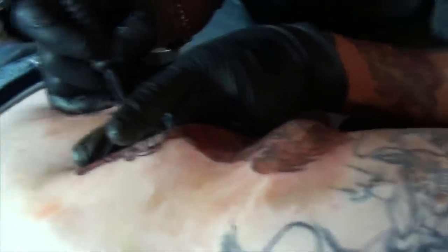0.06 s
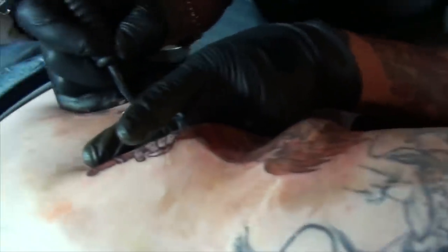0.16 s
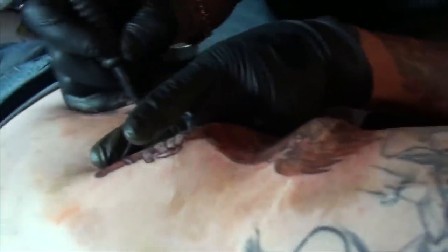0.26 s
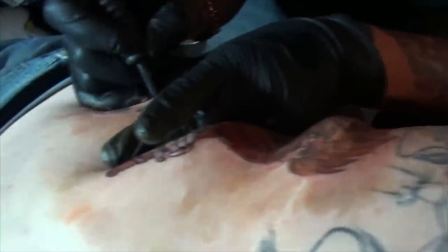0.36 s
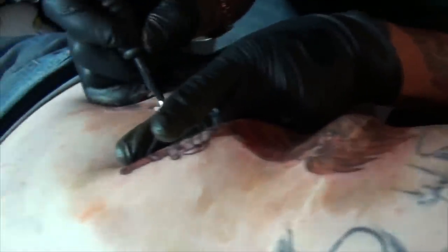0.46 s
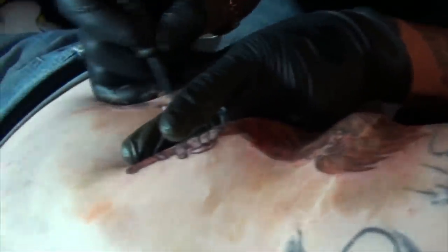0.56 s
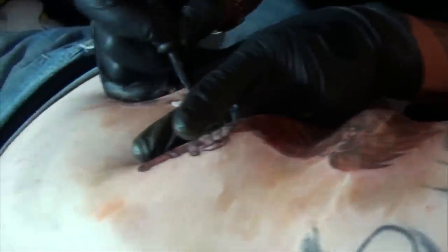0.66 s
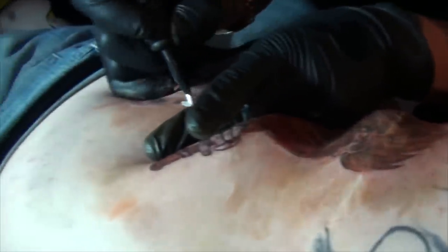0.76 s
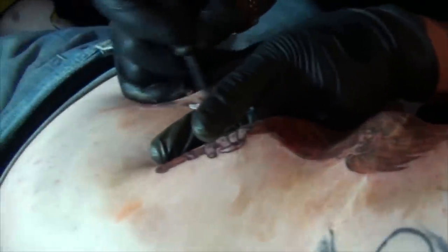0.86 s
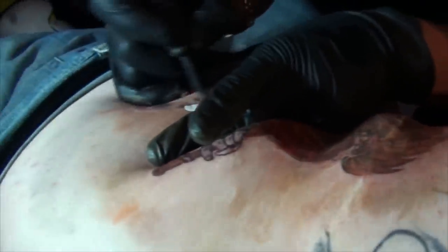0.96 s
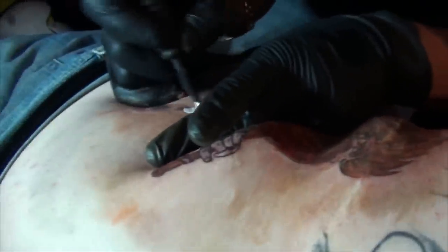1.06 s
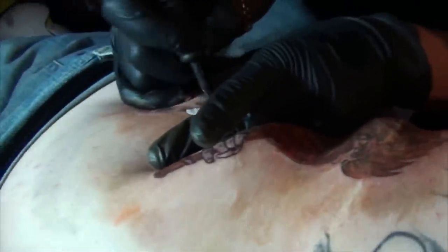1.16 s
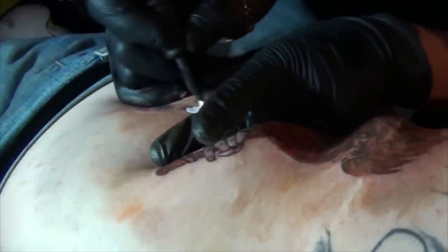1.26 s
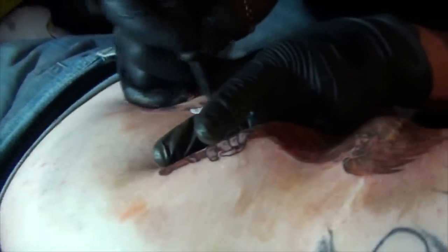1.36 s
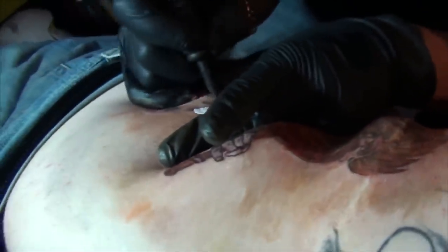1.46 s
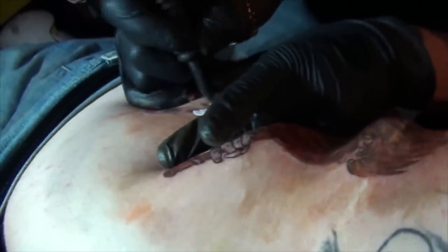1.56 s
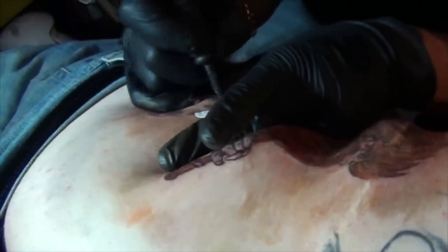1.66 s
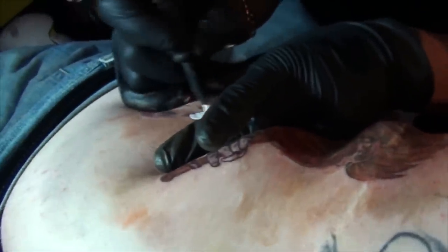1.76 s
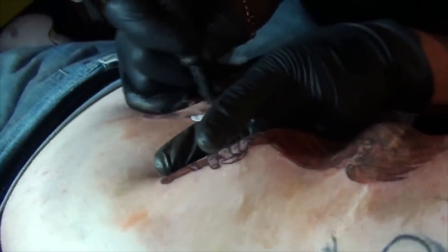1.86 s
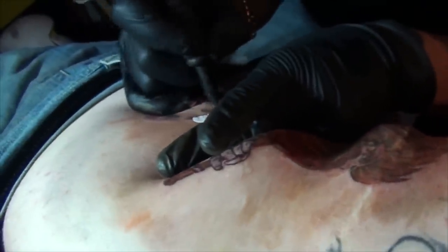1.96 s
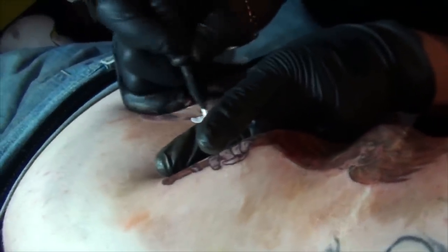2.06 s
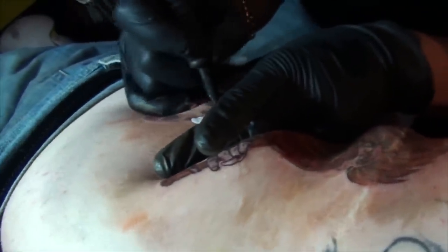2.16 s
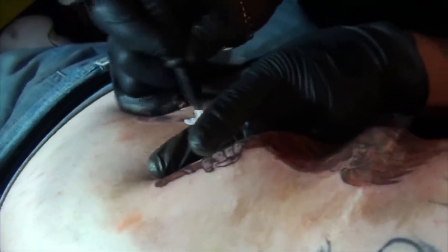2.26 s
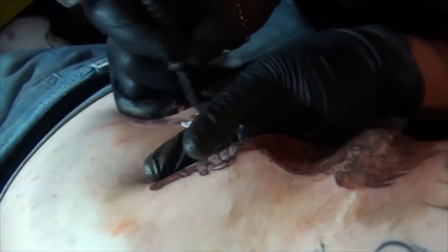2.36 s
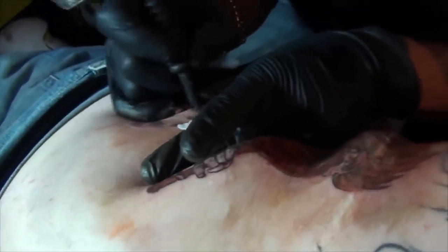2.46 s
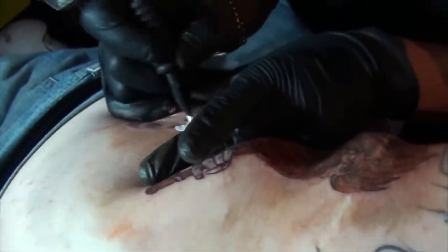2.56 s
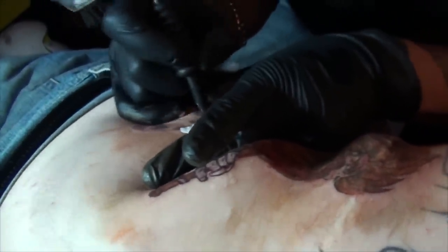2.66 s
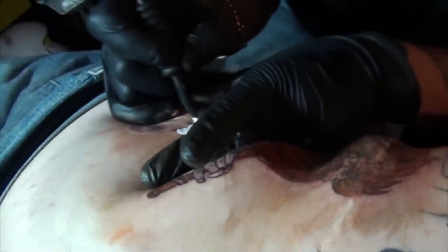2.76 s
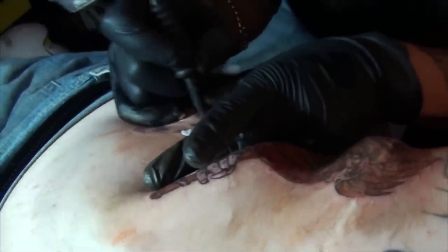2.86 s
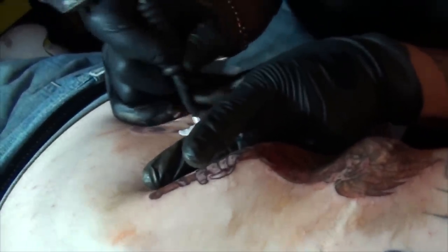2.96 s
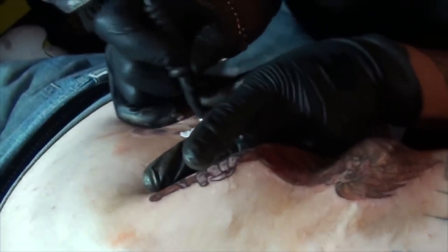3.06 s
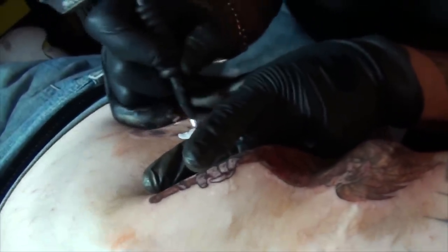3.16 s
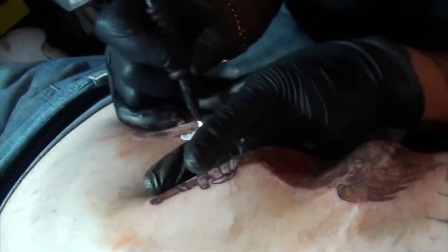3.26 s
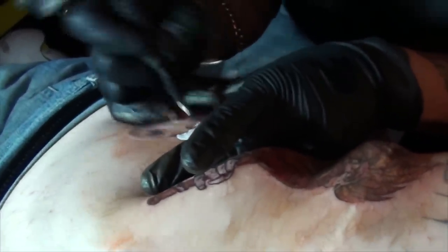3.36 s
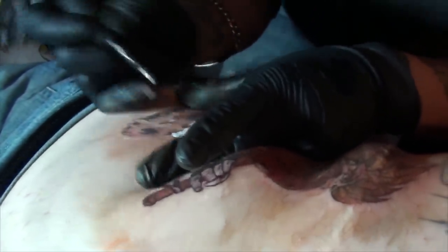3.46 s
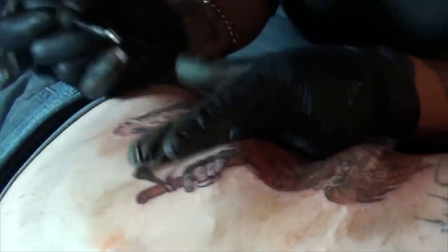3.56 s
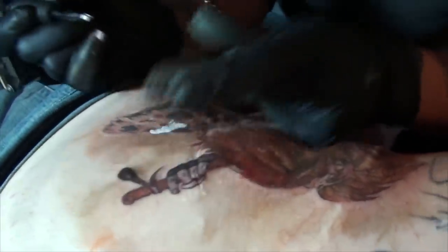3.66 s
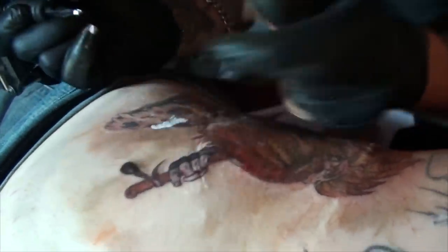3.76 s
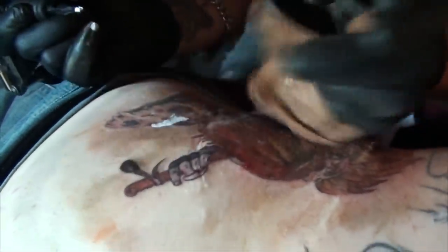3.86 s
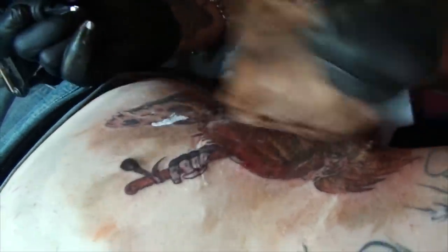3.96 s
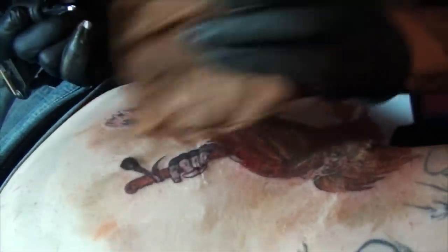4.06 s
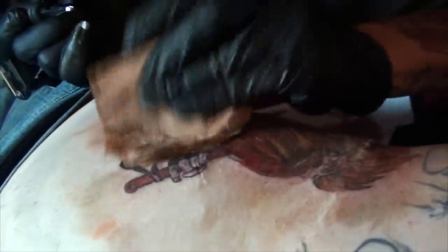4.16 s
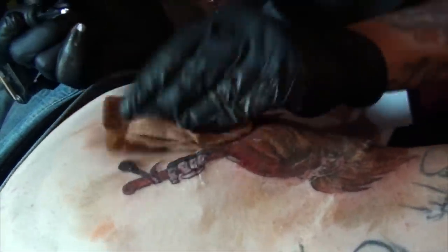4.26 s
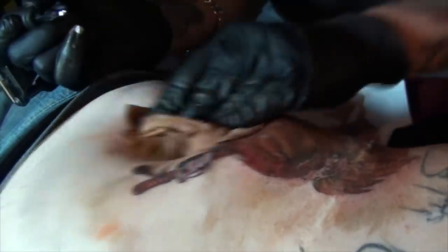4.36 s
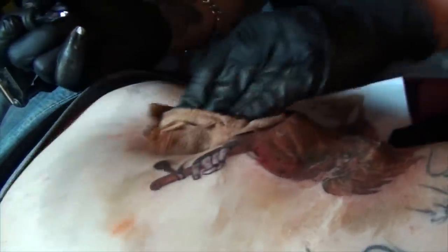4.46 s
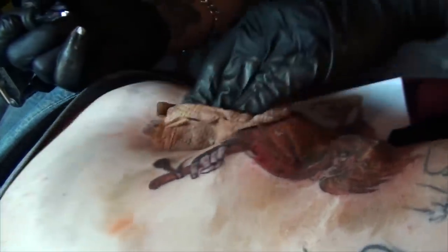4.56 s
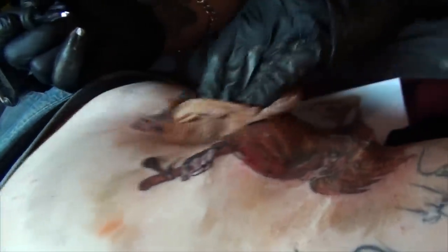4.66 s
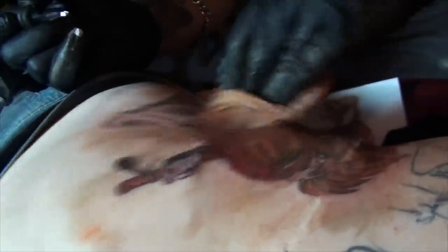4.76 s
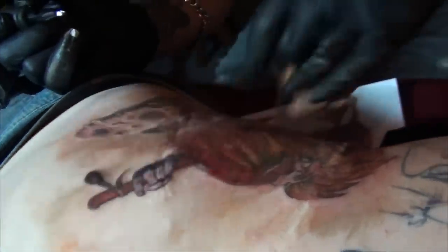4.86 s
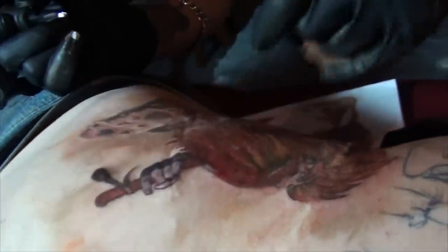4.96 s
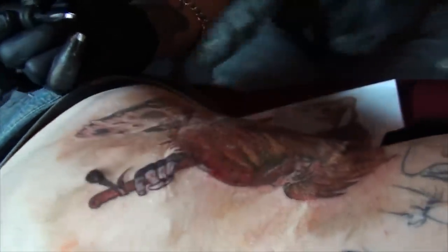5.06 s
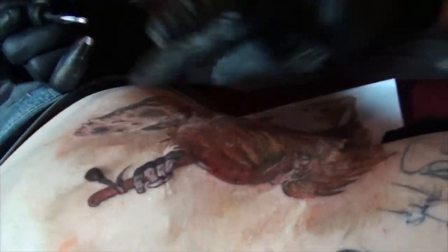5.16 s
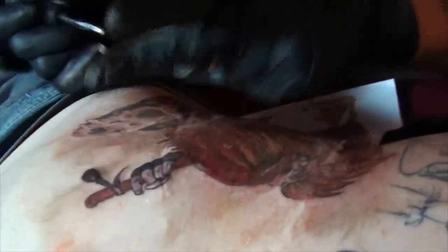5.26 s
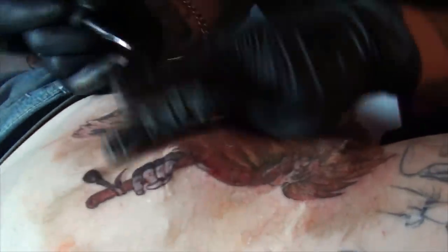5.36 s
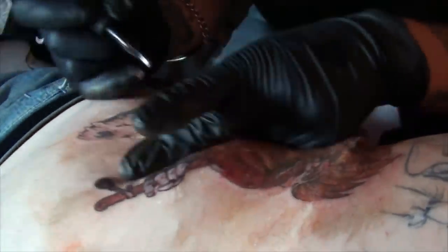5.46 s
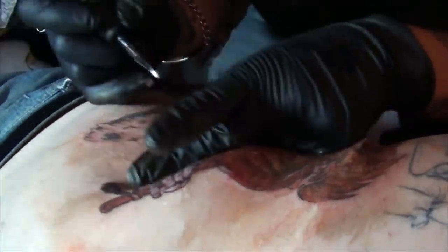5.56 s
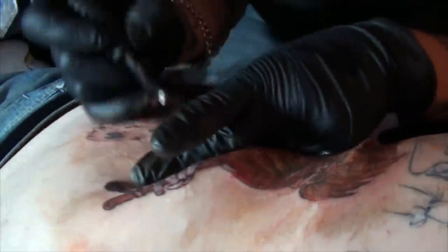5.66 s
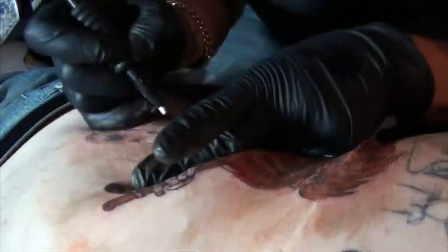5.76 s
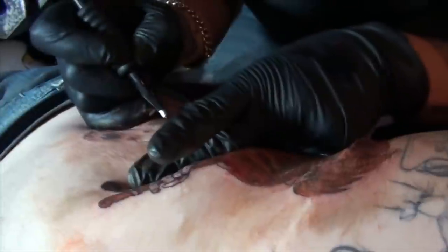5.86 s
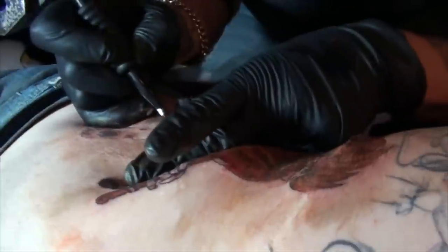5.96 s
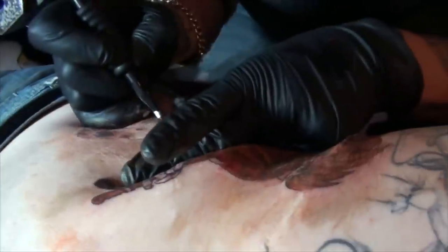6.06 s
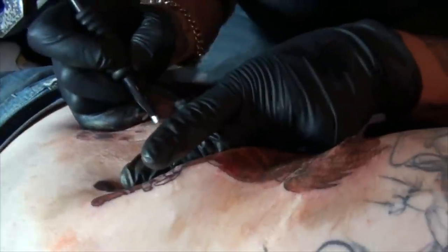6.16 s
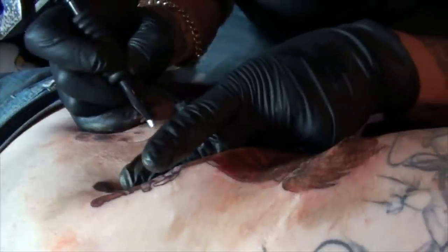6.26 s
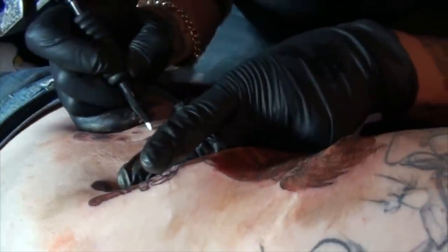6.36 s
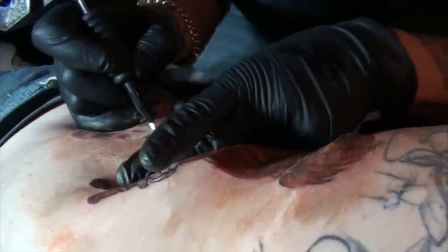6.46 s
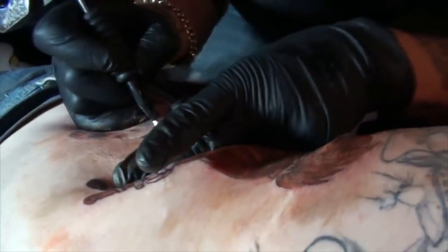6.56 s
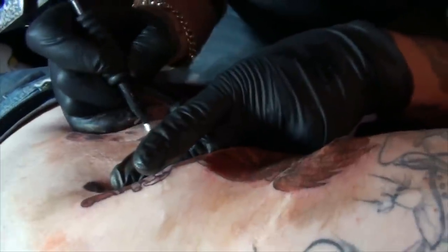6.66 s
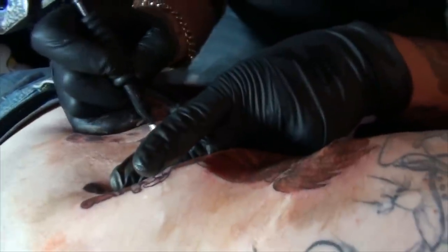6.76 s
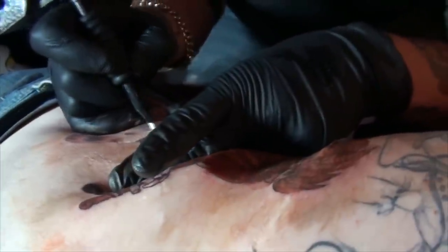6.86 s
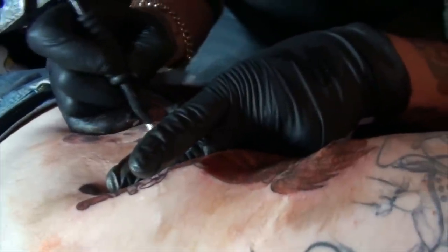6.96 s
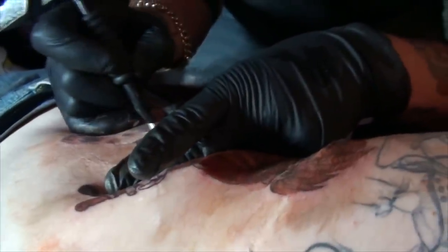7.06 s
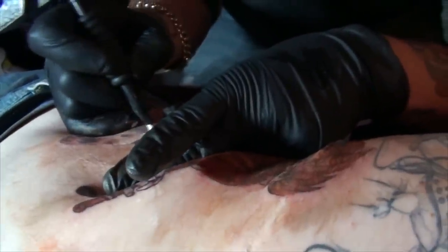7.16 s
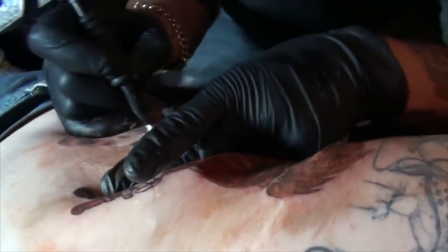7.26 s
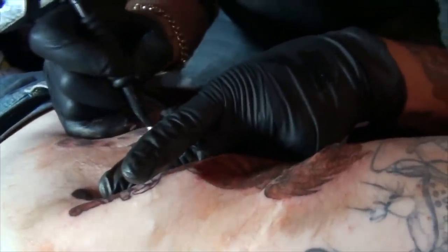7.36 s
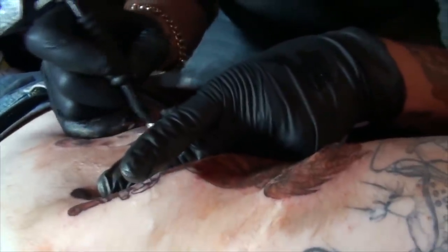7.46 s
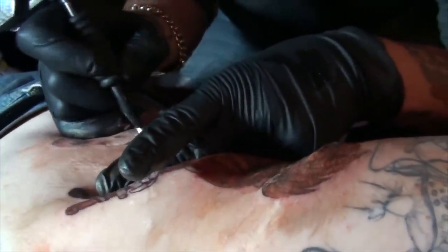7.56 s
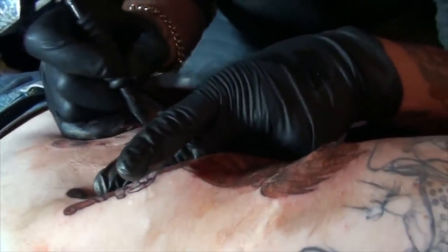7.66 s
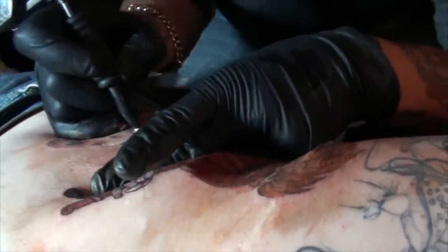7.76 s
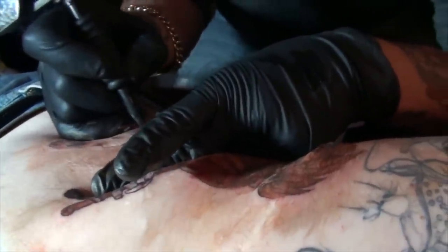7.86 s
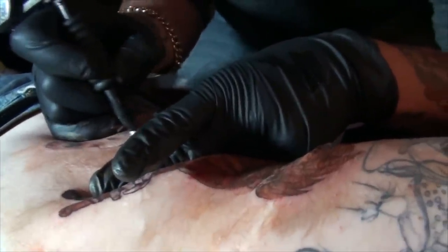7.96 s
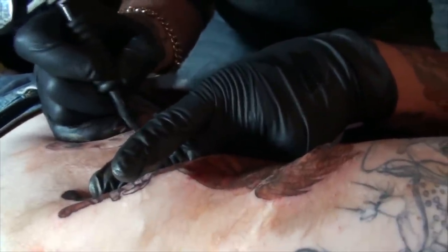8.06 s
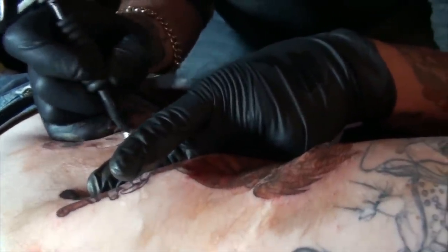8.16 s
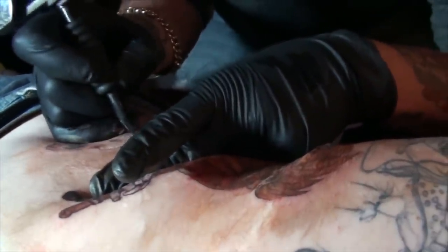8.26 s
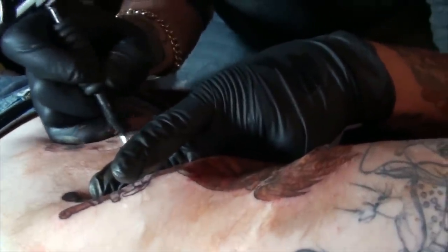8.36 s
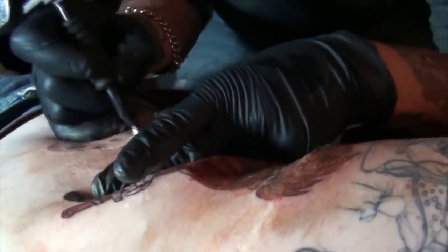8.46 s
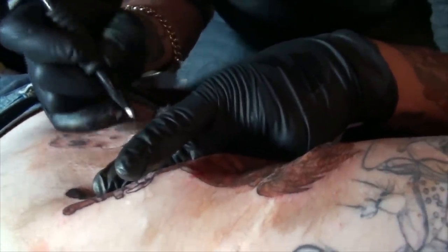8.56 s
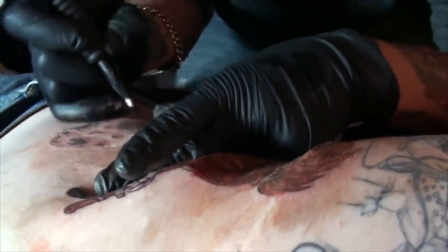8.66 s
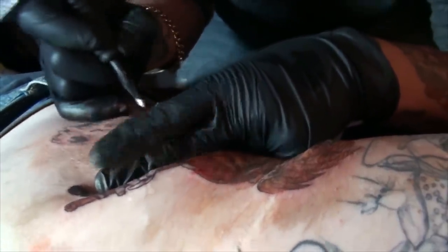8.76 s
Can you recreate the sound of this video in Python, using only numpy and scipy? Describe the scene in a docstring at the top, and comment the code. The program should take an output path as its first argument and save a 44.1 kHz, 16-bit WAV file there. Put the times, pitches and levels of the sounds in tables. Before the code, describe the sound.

In a small, slightly echoing studio, a close tattoo machine buzzes hard and metallic while a shriller second one whines at another bench. The near one cuts off, the far one shortly after; dry paper rubs over skin with light glove pats against a low room rush. Then the near buzz restarts, and later the far one joins. The microphone is close, with the sound leaning right.

```python
"""A near coil tattoo machine buzzes in a small studio: periodic armature impacts excite the modes of its frame.
A second, shriller machine buzzes at another bench, smeared by reflections and a short bench echo.
Both rest while a paper towel wipes the skin by stick-slip friction, amid soft glove pats; the near one restarts
and the far one joins it. Filtered noise and a faint wavering tone make the room's background.
A slowly recovering gain control lets that background rise during the pause."""
import sys
import numpy as np
from scipy import signal
from scipy.fft import rfft, irfft, next_fast_len
from scipy.io import wavfile
from scipy.ndimage import uniform_filter1d

SR = 44100
rng = np.random.default_rng(int(sys.argv[2]) if len(sys.argv) > 2 else 0)


def materialize(psi):
    """Save the field psi as 16-bit PCM at rate SR to the path in sys.argv[1].

    A 1-D psi becomes a single channel; in a 2-D psi each row is a channel.
    """
    bounded = np.clip(np.atleast_2d(psi).T, -1, 1)
    quanta = np.round(bounded * 32767).astype(np.int16)
    wavfile.write(sys.argv[1], SR, quanta)


N = 389403
TIME = np.arange(N) / SR
PADDED = next_fast_len(N + 4096, real=True)
HZ = np.fft.rfftfreq(PADDED, 1 / SR)

# near foot switch held down: (on t/s, off t/s)
NEAR_RUNS = [(0, 3.515), (5.874, 8.84)]
# impacts in one armature cycle: (delay/s, relative level/dB, timing scatter/us,
# delay added under full load/s, level added under full load/dB)
NEAR_IMPACTS = [(0, 13, 3, 0, 1.5), (.00093, -4, 7, 0.00055, -3), (.00284, 3.5, 8, 0.0012, 4.5)]
# ring of the frame shaded by the hand, in the open, and under load: (f/Hz, relative level/dB per Hz)
SHADED_RING = [(1000, -51.5), (1700, -32), (2170, -14.5), (2610, -19.5), (2870, -19), (3060, -9),
               (3330, -16), (4200, -13.5), (5260, -14), (6220, -10.5), (6760, -6.5), (7560, -2),
               (9550, -9.5), (11500, -0.5), (14000, -15.5), (15800, -20)]
OPEN_RING = [(880, -52), (1500, -28), (1720, -17.5), (1830, -27), (1980, -16), (2450, -14), (2800, -18),
             (3020, -8), (3650, -11), (3930, -2), (4150, .5), (4450, -2), (5100, -6.5), (5560, -11.5),
             (6000, -7), (6900, -3), (7700, 1), (8150, -7.5), (9200, -1.5), (9700, -2.5), (10700, -1.5),
             (11700, 2), (13000, -2), (14000, -14), (15800, -16)]
LOADED_RING = [(880, -60.5), (1500, -34), (1700, -18), (1830, -25), (2080, -9), (2380, -8), (2870, -15),
               (3050, -2.5), (3360, -8.5), (3680, -7.5), (4050, -2.5), (4520, -1.5), (5350, 0),
               (5780, -4.5), (6510, -1), (7040, -1), (7450, 2), (8170, -4), (9100, 0), (10500, -4),
               (11800, -3), (13000, 0.5), (13800, -7), (14800, -6.5), (15800, -7.5)]
# clean hum of the frame: (multiple of the strike rate, relative level/dB)
NEAR_HUM = [(5, -23), (6, -14.5), (7, -24.5), (8, -22), (9, -15.5), (10, -21), (11, -27), (12, -16.5),
            (13, -16), (15, -14), (16, -22), (17, -11)]
# level difference, left minus right: (f/Hz, level/dB)
NEAR_SIDE = [(800, -13.5), (2400, -2.5), (4400, -2.5), (8000, -5), (11000, -1.5), (14000, -11.5)]
# reverberation time of the studio by band, for both machines and the towel: (f/Hz, T60/s)
STUDIO_DECAY = [(1000, 0.42), (5000, 0.26), (10000, 0.19), (16000, 0.048)]
STROKE_RISE_HZ = 1.7  # added strike rate per unit of push: load shortens the swing, so strikes quicken


def near_machine(hum_db=-58, hum_waver_db=2.2, close_db=-5.5, hand_sway_per_s=1.7, close_t60=0.008,
                 close_low_db=-6, room_db=-9, sway_per_s=0.6):
    """Impact excitation of modes: strikes ring the steel frame; hand and skin change modes and rebounds."""
    rate_hz, level_db, turned, pressed, depth = grip()
    push = depth * strokes()
    turns = np.cumsum(rate_hz + STROKE_RISE_HZ * push) / SR
    load = pressed + push
    drive = strikes(turns, NEAR_RUNS, NEAR_IMPACTS, uneven_db=1.0, rattle=0.55, rattle_s=0.0023, load=load)

    turned, pressed = np.clip(turned, 0, 1), np.clip(load, 0, 1)
    free = (1 - turned) * ring(drive, SHADED_RING) + turned * ring(drive, OPEN_RING)
    loaded = ring(drive, LOADED_RING)
    buzz = gain_of(level_db) * ((1 - pressed) * free + pressed * loaded)

    hum = np.zeros(N)
    for multiple, db in NEAR_HUM:
        amplitude = gain_of(hum_db + db + hum_waver_db * drift(per_s=9))
        hum += amplitude * np.sin(2 * np.pi * (multiple * turns + rng.random()))
    hum = hum * uniform_filter1d(held(NEAR_RUNS), size=200)  # soft edges

    scattered = shaped(buzz, [(3000, close_low_db), (8000, 0.028)])  # fingers scatter mostly short waves
    close = shifting_echoes(scattered, [(1000, close_t60), (16000, close_t60)], .0001, hand_sway_per_s)
    room = shifting_echoes(buzz, STUDIO_DECAY, 0.0038, sway_per_s)
    return placed(buzz + hum + gain_of(close_db) * close + gain_of(room_db) * room, NEAR_SIDE)


# grips on the near machine: (from t/s, strike rate before strokes f/Hz, level/dB,
# turn from shaded to open 0-1, needle pressed into the skin 0-1, swing of that pressure in a stroke 0-1)
GRIPS = [(0, 131, -37, 0.4, 0.2, 0.15), (.45, 131.1, -37.7, 0.16, 0.18, 0.23),
         (2.1, 131.1, -39, 0.07, 0.15, 0.22), (3.43, 131.2, -34, 1, 0.05, 0.06),
         (5.7, 131.5, -37, 0.88, 0.12, 0.07), (6.499, 131.4, -39.3, 0.76, 0.79, 0.29),
         (7.64, 131.5, -37, 0.66, 0.39, 0.23)]
SHIFT_S = 0.048  # time the hand takes to change grip


def grip():
    """Piecewise-steady control: rate, level, turn, pressure and stroke depth glide from grip to grip."""
    rows = np.array(GRIPS)
    moved = np.clip((TIME - rows[1:, :1]) / SHIFT_S + .5, 0, 1)
    return rows[0, 1:, None] + np.diff(rows[:, 1:], axis=0).T @ moved


STROKES_PER_S, STROKE_UNEVEN = 4.04, 0.0757  # small shading circles; unevenness in turns


def strokes():
    """Phase-jittered circular motion: +1 is deepest in the skin, -1 lightest."""
    return np.cos(2 * np.pi * (STROKES_PER_S * TIME + STROKE_UNEVEN * drift(STROKES_PER_S)))


def strikes(turns, runs, impacts, uneven_db, rattle, rattle_s, load=0, first_swing=0.52, build_s=0.0017,
            size=12):
    """Periodic impact: the armature hits, rebounds and hits its contact; each hit trails a short rattle."""
    at, since = strike_times(turns, runs)
    swing = 1 - (1 - first_swing) * np.exp(-since / build_s)
    load = np.interp(at, TIME, load * np.ones(N))
    clicks, energy = np.zeros(N), 0
    for delay, db, scatter_us, load_s, load_db in impacts:
        slip, force = rng.standard_normal((2, len(at)))
        place = (at + delay + load_s * load + scatter_us * slip / 10 ** 6) * SR
        # a windowed sinc places each click between samples
        index = place.astype(int)[:, None] + np.arange(-size, size + 1)
        offset = index - place[:, None]
        strength = swing * gain_of(db + load_db * load + uneven_db * force)
        pulse = np.sinc(offset) * np.sinc(offset / (size + 1)) * strength[:, None]
        clicks += np.bincount(np.clip(index, 0, N - 1).ravel(), pulse.ravel(), N)
        energy += gain_of(db) ** 2
    keep = np.exp(-1 / (rattle_s * SR))
    trail = np.sqrt(signal.lfilter([1 - keep], [1, -keep], clicks ** 2) + 1e-20)
    fizz = signal.lfilter([1, -.6], [1], rng.standard_normal(N))  # the rattle is brighter than the strike
    scale = np.sqrt(N / turns[-1] / energy / (1 + rattle ** 2))
    return (clicks + rattle * trail * fizz) * scale


def strike_times(turns, runs):
    """Phase accumulation: one strike a cycle from switch-on; gives t/s and time since switch-on/s."""
    rows = []
    for on, off in runs:
        first, last = np.interp([on, off], TIME, turns)
        at = np.interp(np.arange(first, last), turns, TIME)
        rows.append([at, at - on])
    return np.hstack(rows)


def held(runs):
    """On-off gating: 1 while the foot switch is down, 0 otherwise."""
    return sum((TIME >= on) & (TIME < off) for on, off in runs) * 1.


# round trips of a wave through the steel frame, tube and needle bar: (t/s)
ROUND_TRIPS = [.00018, .00031]


def ring(x, points, spread_s=0.001004, bounce=0.64, size=4096):
    """Dispersion and modal ringing: a causal response of unit energy draws each click out into a burst."""
    hz = np.fft.fftfreq(size, 1 / SR)
    log_gain = np.log(gain_of(read(points, abs(hz))))
    # bending waves carry the treble ahead; spread_s is their delay at 2 kHz
    lag = 4 * np.pi * spread_s * np.sign(hz) * np.sqrt(2000 * abs(hz))
    spectrum = np.exp(np.conj(signal.hilbert(log_gain)) - 1j * lag)  # minimum phase, then the lag
    bounce = np.clip(bounce, 0, .85)
    for trip in ROUND_TRIPS:  # lossless (all-pass) bouncing between the ends
        echo = np.exp(-2j * np.pi * hz * trip)
        spectrum = spectrum * (echo - bounce) / (1 - bounce * echo)
    response = np.fft.ifft(spectrum).real[:size // 2]
    return signal.oaconvolve(x, response / np.linalg.norm(response))[:N]


def shifting_echoes(x, decay, gap_s, turns_per_s, count=3):
    """Time-varying multipath: crossfaded echo patterns keep changing as hands and bodies move."""
    angle = np.pi * (turns_per_s * TIME + rng.random() + np.arange(count)[:, None] / count)
    fades = np.cos(angle) ** 2
    fades = fades / np.linalg.norm(fades, axis=0)
    return sum(reflections(x * fade, decay, gap_s) for fade in fades)


def reflections(x, decay, gap_s, alike=0.37, size=128):
    """Diffuse reverberation: dense unit-energy echoes, partly alike on both sides, each band with its own T60."""
    alike = np.clip(alike, 0, 1)
    common, *own = rng.choice([-1., 1.], (3, SR // 4))
    echoes = np.sqrt(alike) * common + np.sqrt(1 - alike) * np.array(own)
    hz, t, z = signal.stft(echoes, SR, nperseg=size)
    fading = gain_of(-60 * t / read(decay, hz)[:, None])
    tail = signal.istft(z * fading, SR, nperseg=size)[1]
    # silent for gap_s, then fading in over another gap_s
    tail = tail * np.clip(np.arange(tail.shape[1]) / SR / gap_s - 1, 0, 1)
    tail = tail / np.linalg.norm(tail, axis=1, keepdims=True)
    return signal.oaconvolve(x[None], tail, axes=1)[:, :N]


# far foot switch held down: (on t/s, off t/s)
FAR_RUNS = [(.15, 0.17), (.415, 4.135), (7.59, 8.84)]
# impacts in one armature cycle: (delay/s, relative level/dB, timing scatter/us,
# delay added under full load/s, level added under full load/dB)
FAR_IMPACTS = [(0, 3.3, 27.2, 0, 0), (.0012, 13.4, 64.7, 0, 0)]
# ring of the far frame: (f/Hz, relative level/dB per Hz)
FAR_RING = [(1500, -51), (2050, -35), (2400, -29), (2900, -28.5), (3350, -25.5), (3900, -20.5), (5900, -20),
            (6500, -12.5), (6980, -5), (7850, -14.5), (8700, -10.5), (9550, 1), (10400, -6.5),
            (12300, -12.5), (13600, -22.5), (15700, -22)]
# level difference, left minus right: (f/Hz, level/dB)
FAR_SIDE = [(2400, -5.5), (4400, -8.5), (9000, -4), (12000, -8.5), (14000, -37)]
# it starts at its full rate and slows as it runs; level before the direct and echo paths
FAR_HZ, FAR_SAG_HZ_PER_S, FAR_DB = 107.56, .35, -34.5


def far_machine(direct_db=-7, close_db=-6, close_t60=0.044, room_db=0, waver_hz=.4, sway_per_s=1.5,
                rush_db=-72):
    """Direct and reverberant sound: a slower, shriller machine's strikes are smeared by the room."""
    waver = waver_hz * drift(per_s=18)  # the load on its needle varies
    turns = np.cumsum(FAR_HZ - FAR_SAG_HZ_PER_S * running_s(FAR_RUNS) + waver) / SR
    drive = strikes(turns, FAR_RUNS, FAR_IMPACTS, uneven_db=2.0, rattle=0.49, rattle_s=0.00072)
    buzz = gain_of(FAR_DB) * ring(drive, FAR_RING)
    rush_shape = [(300, -11.5), (550, -3), (1200, 1.0), (1900, 2.5), (3000, -5), (7000, -30)]
    rush = shaped(rng.standard_normal(N), rush_shape)
    buzz = buzz + gain_of(rush_db) * evened(rush) * held(FAR_RUNS)  # a dull hiss lies under the buzz
    # echoes off its bench
    close = shifting_echoes(buzz, [(1000, close_t60), (16000, close_t60)], 0.00018, sway_per_s)
    room = shifting_echoes(buzz, STUDIO_DECAY, 0.0023, sway_per_s)
    return placed(gain_of(direct_db) * buzz + gain_of(close_db) * close + gain_of(room_db) * room, FAR_SIDE)


def running_s(runs):
    """Elapsed-time ramp: time since the foot switch last closed, 0 while it is up."""
    return sum((TIME - on) * held([(on, off)]) for on, off in runs)


# spectrum of paper on skin: (f/Hz, relative level/dB per Hz)
PAPER = [(880, -44), (1500, -17), (1870, -10), (2810, -8), (3030, -5), (3600, -7.5), (10300, -10.5),
         (15000, -18)]


def towel(grain_db=3.5, snag_db=3.0, room_db=-4, left_db=-5):
    """Stick-slip friction: paper fibres catch and slip in tiny grains, clumped where the folds snag."""
    grains = rng.standard_normal(N) * gain_of(grain_db * np.minimum(rng.exponential(1, N), 5))
    snagging = gain_of(snag_db * drift(per_s=140))
    rub = evened(shaped(grains, PAPER) * snagging) * wiping()
    room = reflections(rub, STUDIO_DECAY, gap_s=0.0016)
    return (rub + gain_of(room_db) * room) * gain_of([[left_db], [0]])


# strokes of the paper towel on skin: (loudest moment t/s, level before echoes/dB, swell/s, fade/s)
WIPES = [(4.24, -68.5, 0.088, 0.19), (4.505, -71.5, .015, 0.027), (4.79, -77, 0.12, 0.099),
         (4.858, -63.5, 0.051, 0.025), (5, -76, 0.09, .25), (5.16, -70, .018, .025),
         (5.21, -70, 0.028, .06)]
WIPE_EDGE_DB = -14  # level relative to the peak, one swell time before it or one fade time after it


def wiping():
    """Exponential envelopes summed in power: each stroke swells to its peak and fades."""
    power = np.zeros(N)
    for peak_s, db, swell, fade in WIPES:
        away = np.maximum((peak_s - TIME) / swell, (TIME - peak_s) / fade)
        power += gain_of(db + WIPE_EDGE_DB * away) ** 2
    return power ** .5


# light touches of the gloved hand: (t/s, level before decay/dB, f/Hz, decay time constant/s)
TOUCHES = [(4.22, -64.5, 1240, 0.043), (5.155, -73, 3710, .015), (5.195, -68, 3800, .003),
           (5.296, -66, 3970, .003)]


def touches():
    """Damped impact noise: each soft pat is a band of noise that dies exponentially."""
    out = np.zeros(N)
    for s, db, hz, ring_s in TOUCHES:
        t = np.arange(SR // 5) / SR
        band = signal.butter(2, [hz * .75, hz * 1.3], "band", fs=SR, output="sos")
        noise = evened(signal.sosfilt(band, rng.standard_normal(len(t))))
        out[round(s * SR):][:len(t)] += gain_of(db) * noise * np.exp(-t / ring_s)
    return out


# low noise of the room: (f/Hz, relative level/dB per Hz)
AIR = [(25, -25), (52, -15), (97, -22), (120, -7), (170, -4.5), (225, -6.5), (310, -2.5), (420, -9.5),
       (650, -11.5), (790, -10), (950, -15), (1500, -18), (3000, -26), (11000, -33), (15000, -45)]
# correlation between sides: (f/Hz, share of power common to both 0-1)
AIR_SAME = [(50, 0.3), (150, 0.41), (300, 0.47), (600, 0.21), (2000, 0.85)]
# level difference, left minus right: (f/Hz, level/dB)
AIR_SIDE = [(60, -18), (150, -17), (380, -16), (950, -10.5), (2380, -9.5), (5980, -2.5), (15000, -12)]


def room_air(level_db=-69):
    """Partly correlated noise: a steady low rush, its share common to both sides set by frequency."""
    common, *own = rng.standard_normal((3, N))
    same = np.clip(read(AIR_SAME, HZ), 0, 1)
    noise = filtered(common, np.sqrt(same)) + filtered(np.array(own), np.sqrt(1 - same))
    pair = placed(shaped(noise, AIR), AIR_SIDE)
    return gain_of(level_db) * pair / np.std(pair.mean(0))


def room_tone(hz=772, level_db=-83, waver_hz=6, waver_db=3, right_db=-10):
    """Frequency and amplitude modulation: a faint wavering hum, heard when the machines rest."""
    turns = np.cumsum(hz + waver_hz * drift(per_s=30)) / SR
    amplitude = gain_of(level_db + waver_db * drift(per_s=7))
    return amplitude * np.sin(2 * np.pi * turns) * gain_of([[0], [right_db]])


def gain_of(db):
    """Logarithmic level: decibels to amplitude."""
    return 10 ** (np.asarray(db) / 20)


def evened(x):
    """Power normalization: scales to rms 1."""
    return x / np.sqrt(np.mean(x ** 2) + 1e-20)


def drift(per_s):
    """Interpolated random process: per_s new random values a second, joined by straight lines."""
    values = rng.standard_normal(SR)
    return np.interp(TIME * per_s, np.arange(len(values)), values)


def read(points, hz):
    """Log-frequency interpolation: reads a spectrum table."""
    f, value = np.transpose(points)
    return np.interp(np.log(hz + 1), np.log(f + 1), value)


def filtered(x, gain):
    """Linear filtering: multiplies the spectrum by a gain for each frequency."""
    return irfft(rfft(x, PADDED) * gain, PADDED)[..., :N]


def shaped(x, points):
    """Spectral shaping: filters by a table of levels."""
    return filtered(x, gain_of(read(points, HZ)))


def placed(pair, side):
    """Level-difference panning: shares each frequency between left and right."""
    ratio = gain_of(read(side, HZ))
    return filtered(pair, np.array([ratio, np.ones_like(ratio)]) * 2 / (1 + ratio))


def scene():
    """Superposition: both machines, the towel, the glove and the room."""
    return near_machine() + far_machine() + towel() + touches() + room_air() + room_tone()


def record(dry, threshold_db=-43, squeeze=0.62, recovery_db_per_s=14.5, edge_hz=15800):
    """Dynamic compression: gain falls promptly and recovers slowly; then a low-pass limits the band."""
    power_db = 10 * np.log10(abs(uniform_filter1d(dry.mean(0) ** 2, size=1000)) + 1e-12)
    fall = TIME * recovery_db_per_s  # slope of the held level; squeeze scales its effect on the gain
    held_db = np.maximum.accumulate(power_db + fall) - fall
    over_db = np.maximum(held_db - threshold_db, 0)
    ducked = dry / gain_of(squeeze * uniform_filter1d(over_db, size=200))
    low_pass = signal.firwin(511, edge_hz, window=("kaiser", 9), fs=SR)
    return signal.oaconvolve(ducked, low_pass[None], "same")


dry = scene()
out = record(dry)
materialize(out)
```